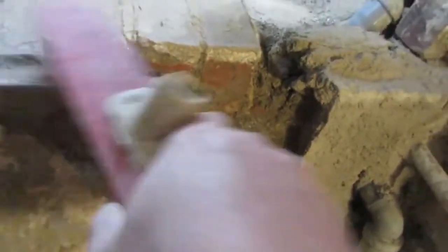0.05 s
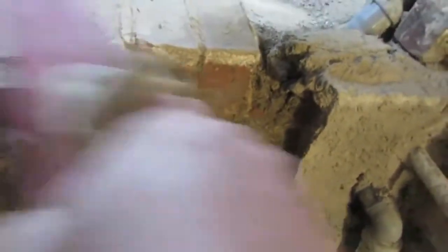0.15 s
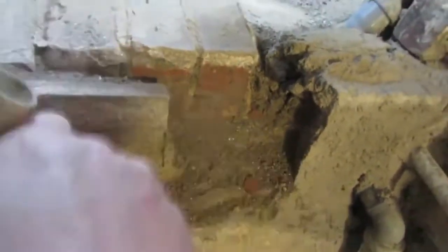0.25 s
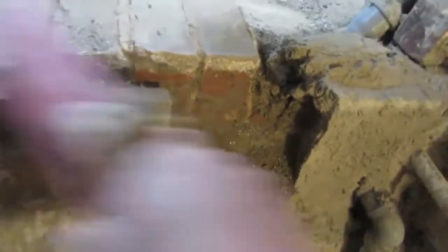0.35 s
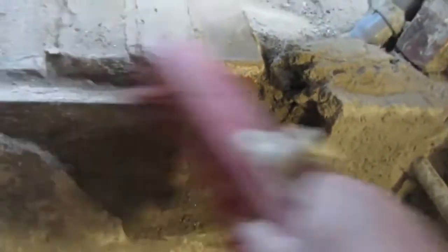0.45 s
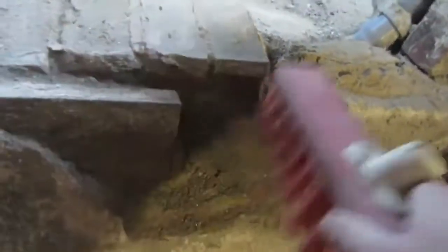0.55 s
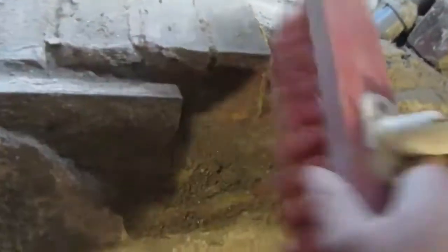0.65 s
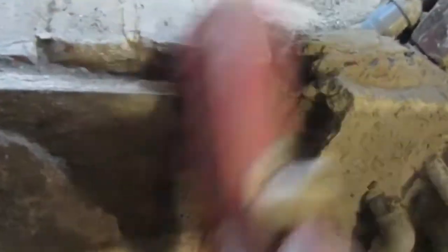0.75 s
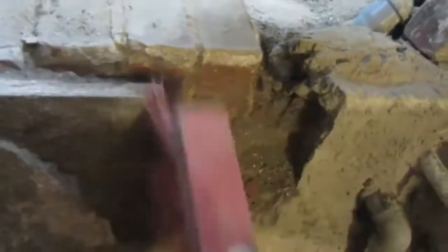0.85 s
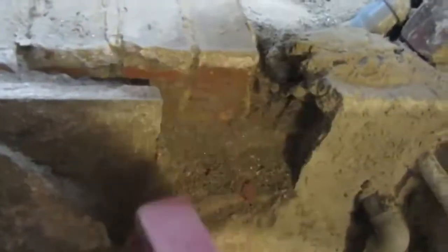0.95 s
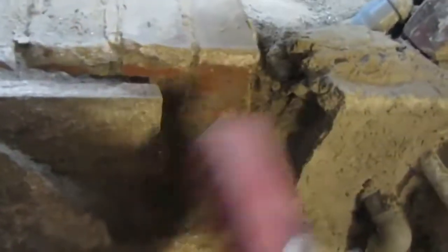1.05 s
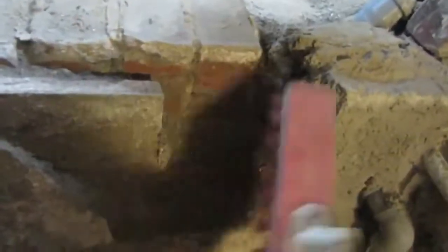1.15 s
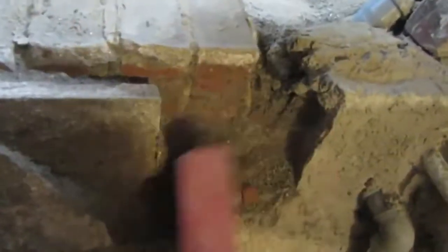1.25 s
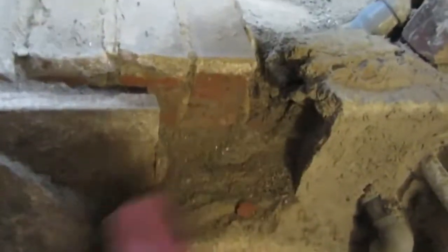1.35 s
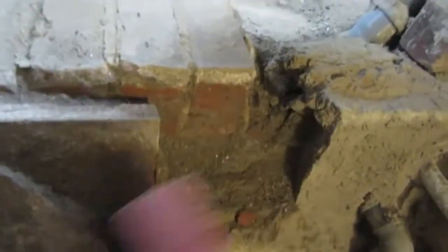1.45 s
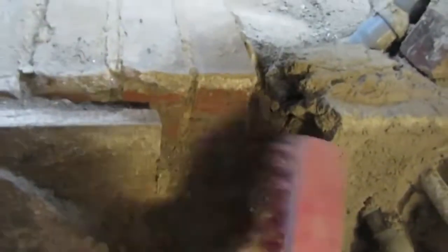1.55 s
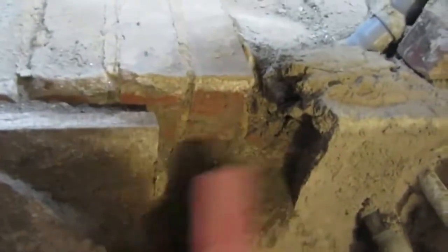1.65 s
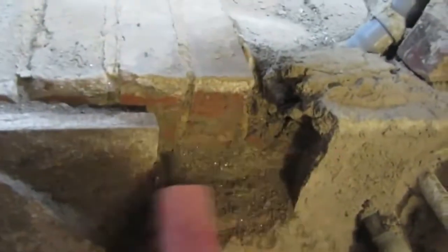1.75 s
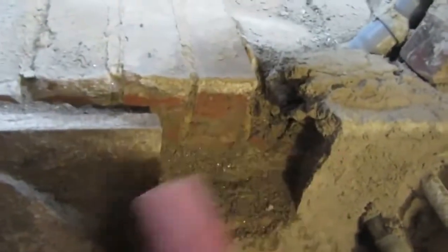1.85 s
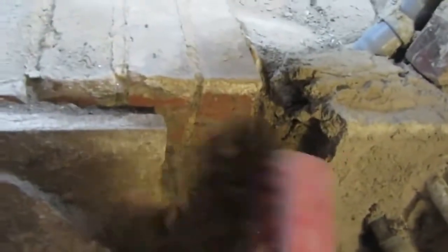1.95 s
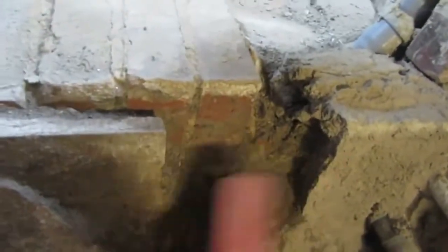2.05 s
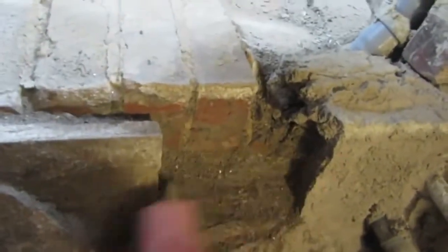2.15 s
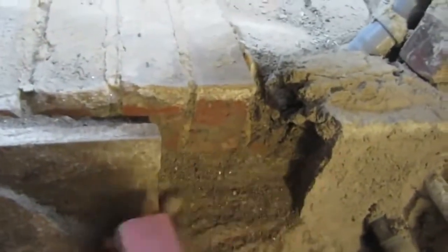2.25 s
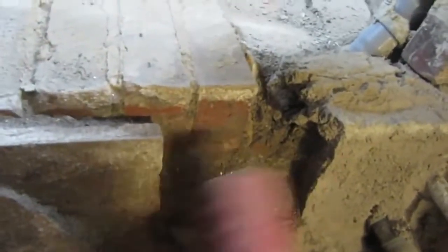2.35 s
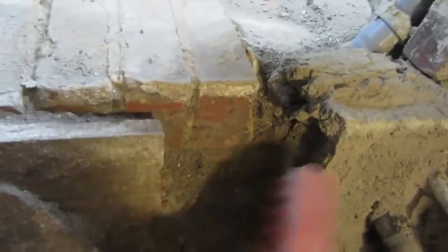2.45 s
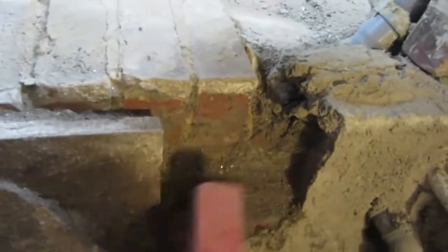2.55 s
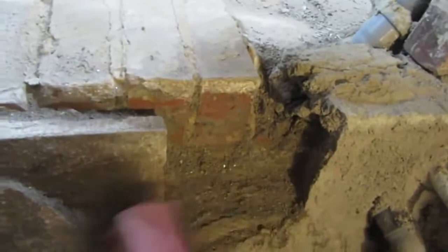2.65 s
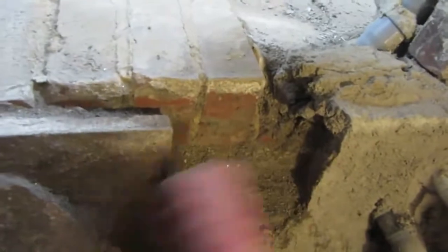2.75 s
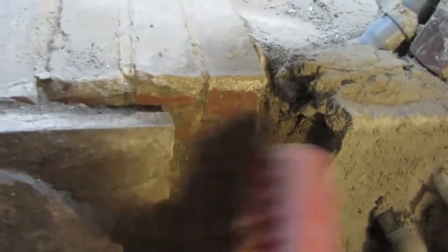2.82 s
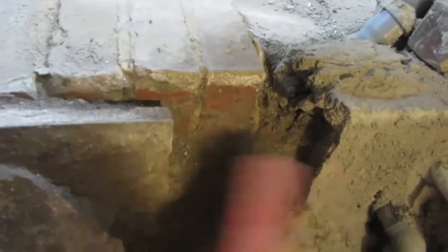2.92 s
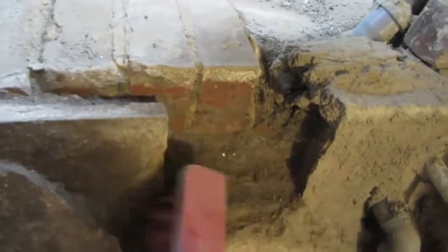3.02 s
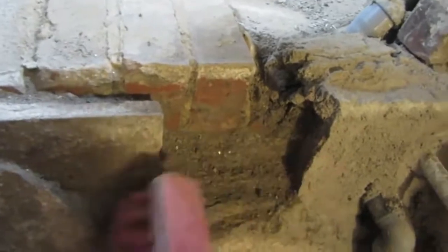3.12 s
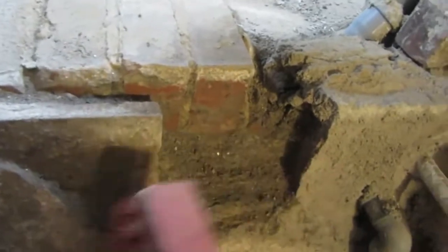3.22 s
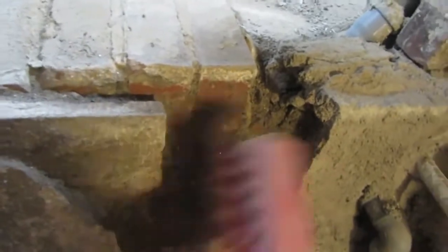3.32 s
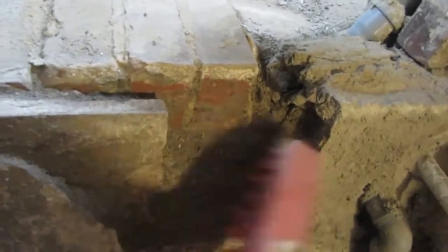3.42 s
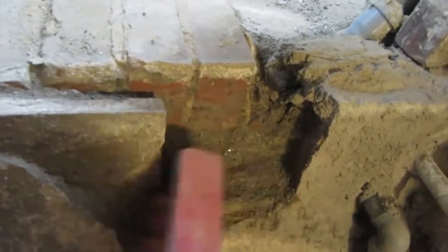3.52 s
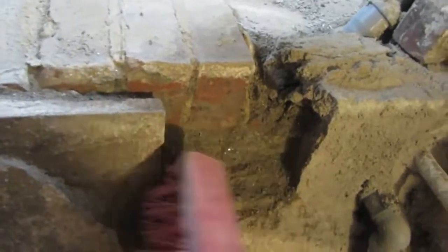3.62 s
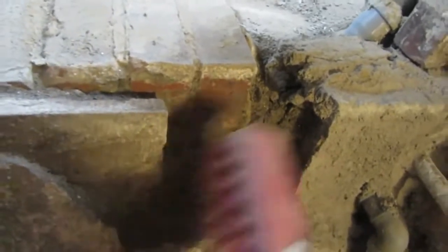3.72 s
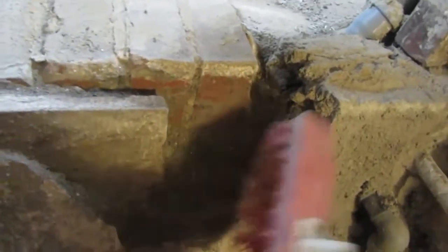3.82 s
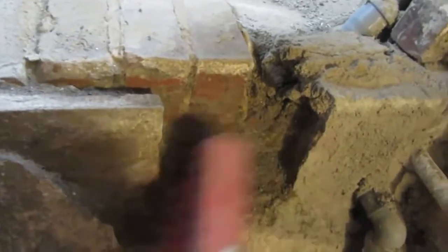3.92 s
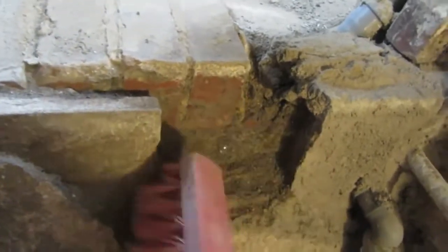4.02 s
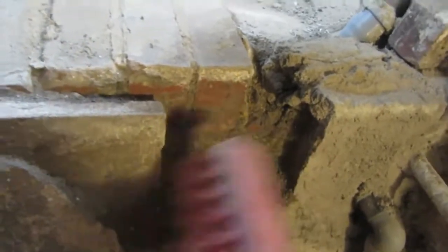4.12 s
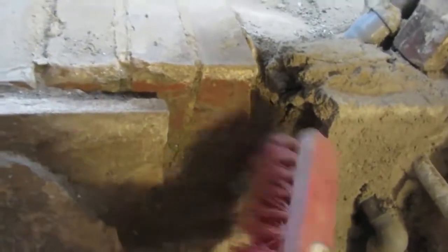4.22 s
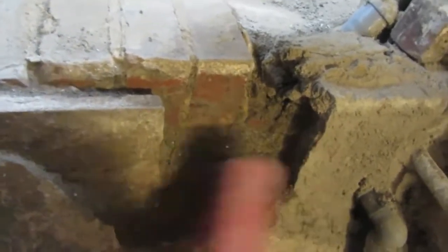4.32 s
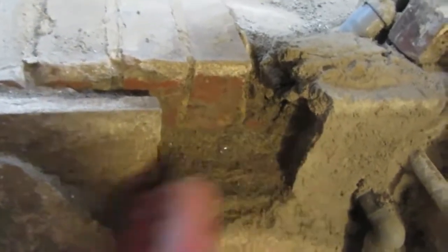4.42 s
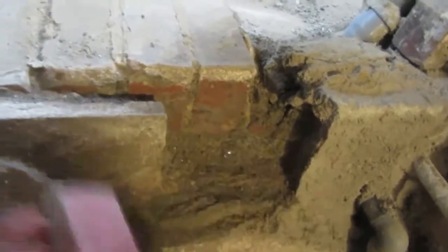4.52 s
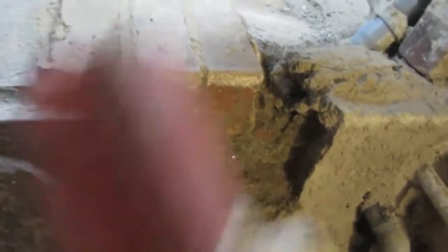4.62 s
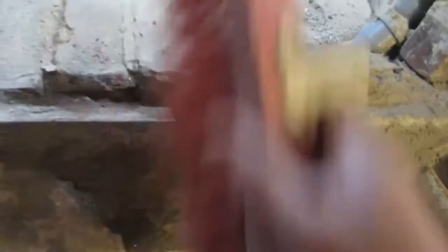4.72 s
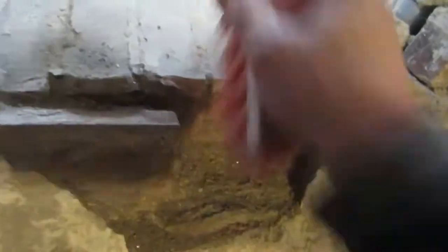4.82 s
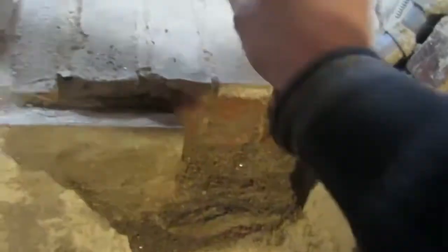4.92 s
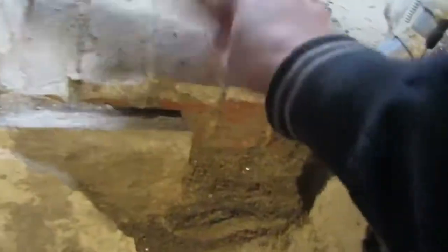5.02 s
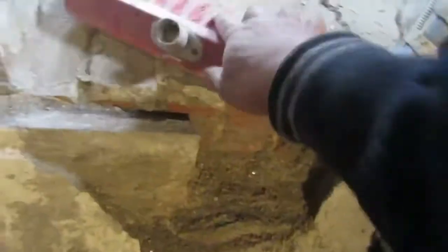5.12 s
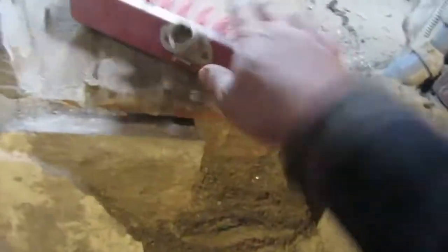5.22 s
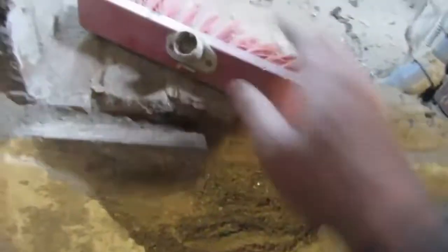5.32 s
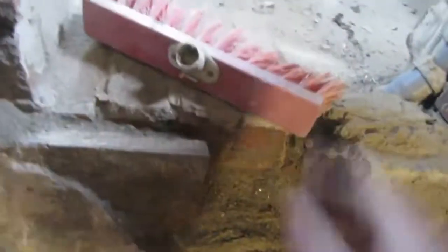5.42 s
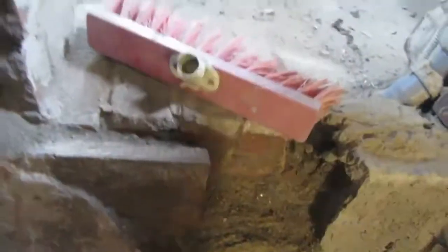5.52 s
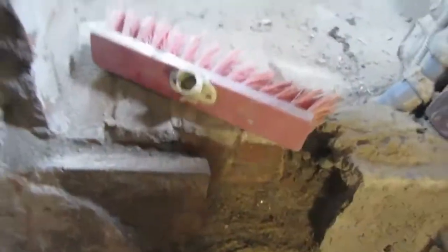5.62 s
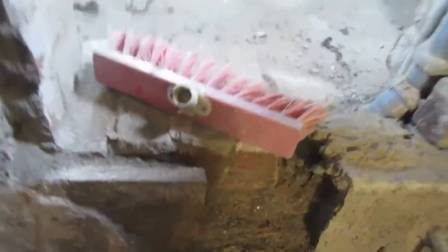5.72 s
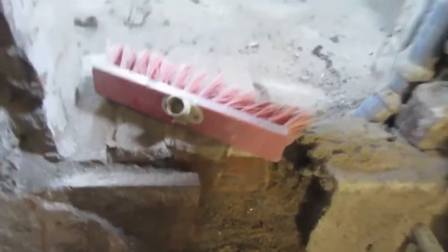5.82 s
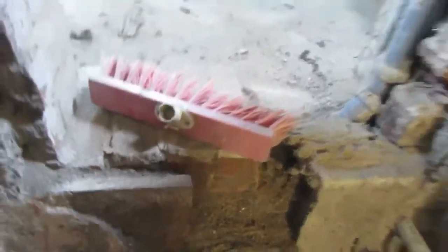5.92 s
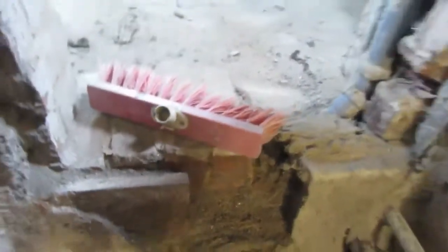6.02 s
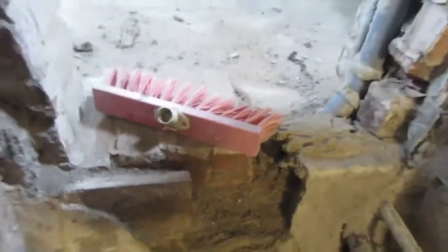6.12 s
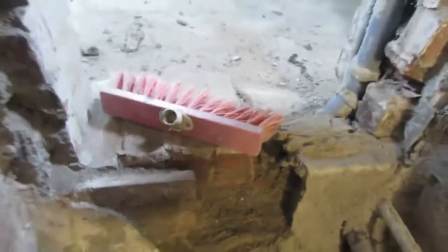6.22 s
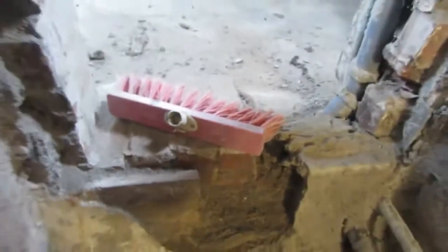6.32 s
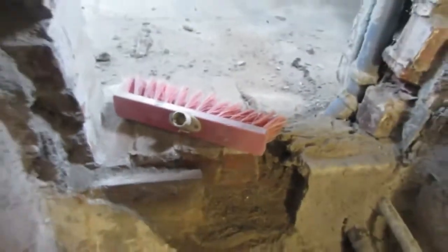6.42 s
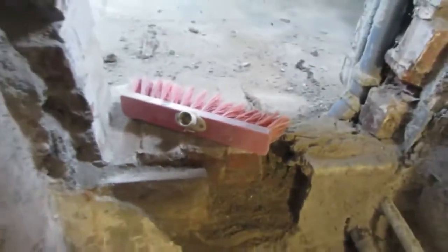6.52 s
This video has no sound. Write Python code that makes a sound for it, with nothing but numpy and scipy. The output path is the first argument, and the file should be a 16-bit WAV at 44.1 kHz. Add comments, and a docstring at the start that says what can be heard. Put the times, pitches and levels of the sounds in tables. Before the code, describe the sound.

Dry, close mono sound of a stiff brush scrubbing rough masonry in a stone corner, with only a short reflection around the knocks. It opens mid-stroke; strokes near 0.4 and 0.85 s run along a hard ledge, thin and scrapy, the earliest slightly ringing, with a sharp knock at 0.83. From 1.25 to 4.5 s bright hissing rasps land roughly every 0.4 s, fuller and stronger around 2.5 s, each with a woody block knock or low thump. Crisp chips tick throughout, sharpest around 1.55-1.7 s, and fine grit trickles between strokes. After 4.6 s only light rustle and grit remain. At 5.1 s the brush drops with the loudest, hard, overloaded clack and a small follow-up knock. Then quiet airy room noise and faint low hum, tiny touches near 5.6 and 6.1, a soft scuff at 6.36, and a faint whirr from 6.2 until the end at about 6.6 s.

```python
"""Stiff brush on rough masonry

A stiff hand brush scrubs grit off masonry in a stone corner, close to a small mono microphone.
Shaped noise snaps are the bristle tips; struck damped modes are the block knocking the stone.
Short noise bursts are loose grit ticking and trickling in between, softly struck low modes the thumps.
At last the brush is dropped, and a quiet room of air noise and hum remains, with a few faint touches."""
import sys
import numpy as np
from scipy import signal
from scipy.fft import rfft, irfft
from scipy.io import wavfile
from scipy.ndimage import uniform_filter1d

SR = 44100
rng = np.random.default_rng(int(sys.argv[2]) if len(sys.argv) > 2 else 0)


def gain_from_db(level_db):
    """Convert decibel levels to linear amplitude factors (20 dB per decade)."""
    decades = np.asarray(level_db, float) / 20
    return 10 ** decades


def digitize_waveform(pressure):
    """Quantize a signal to 16-bit integers and store it at the path in sys.argv[1].

    Rows of a 2-D input are taken as channels; values are limited to [-1, 1].
    """
    field = np.atleast_2d(pressure).T
    bounded = np.clip(field, -1, 1)
    quanta = np.round(bounded * 32767).astype(np.int16)
    wavfile.write(sys.argv[1], SR, quanta)


N = 289736

# modes of the brush block: (f/Hz, level before the drive/dB, t60/s)
BLOCK_MODES = [(170, 5, 0.026), (323, 9.5, 0.028), (656, -1.5, 0.012), (883, 4.5, .016),
               (1060, 1.5, 0.0099), (1380, 3.5, 0.015), (1700, 7.5, 0.0033), (2200, 18.5, 0.0024),
               (2900, 12, 0.0021), (4460, -10.5, 0.0026), (7250, 4, 0.0067)]
# the first strokes run along a hard ledge, a thin scrape that rings at first:
# (ring f/Hz, base t60/s, ring level re scrape/dB, ring until t/s, ledge until t/s)
LEDGE = (1860, .018, -3.5, .6, 1.06)


def unit(x):
    """Scale to rms 1."""
    return x / np.sqrt(np.mean(x ** 2))


def colour(x, points):
    """Filter by an (f/Hz, level/dB) outline."""
    hz, db = np.transpose(points)
    bins = np.arange(len(x) // 2 + 1) * SR / len(x) + 1
    gain_db = np.interp(np.log(bins), np.log(hz), db)
    return irfft(rfft(x) * gain_from_db(gain_db), len(x))


def band(x, low_hz, high_hz, order=2):
    """Butterworth band-pass."""
    edges = [low_hz, min(high_hz, .45 * SR)]
    return signal.sosfilt(signal.butter(order, edges, "band", fs=SR, output="sos"), x)


def ring(x, hz, t60):
    """One damped mode; a unit impulse starts it ringing with amplitude near 1."""
    r, w = np.exp(-np.log(1000) / (t60 * SR)), 2 * np.pi * hz / SR
    return signal.lfilter([0, r * np.sin(w)], [1, -2 * r * np.cos(w), r * r], x)


def walk(rate):
    """Random levels, a new one every 1 / rate s, joined by slopes; spread a little under 1."""
    k = int(SR / rate)
    steps = np.repeat(rng.standard_normal(N // k + 1), k)
    return uniform_filter1d(steps, k)[:N]


def snaps(rate, spread_db):
    """Tiny releases at random moments, rate per s, a few far larger than the rest."""
    moments = rng.random(N) < rate / SR
    return moments * rng.standard_normal(N) * gain_from_db(spread_db * rng.exponential(size=N))


def add(out, s, sound, db):
    """Place a sound at time s with the given peak."""
    i = int(s * SR)
    sound = sound[:N - i]
    out[i:i + len(sound)] += sound * gain_from_db(db) / np.abs(sound).max()


def curves(table):
    """Columns of a (t/s, ..) table, interpolated at every sample."""
    s, *columns = np.transpose(table)
    return [np.interp(np.arange(N) / SR, s, c) for c in columns]


def room():
    """Still air as coloured noise, a narrow noise hum that wavers and a faint whirr that sets in late."""
    # spectrum of the air: (f/Hz, relative level/dB)
    air_outline = [(15, -45.5), (25, -9.5), (354, 4.5), (1060, 8.5), (1350, 4.5), (2020, -3), (2370, -20),
                   (3010, -16), (3540, -25.5), (5140, -12), (15000, -35)]
    # swelling of the hum: (t/s, level/dB)
    hum_levels = [(0, -78), (.66, -55.5), (.95, -76), (1.66, -60), (2.1, -59), (2.4, -65), (4.55, -63.5),
                  (4.85, -53.5), (5.4, -81.5), (6.57, -63.5)]
    # late whirr: (from t/s, low f/Hz, high f/Hz, mean level/dB)
    whirr_setting = (6.17, 1500, 1950, -63)
    air = gain_from_db(-61 + 1.0 * walk(18)) * unit(colour(rng.standard_normal(N), air_outline))
    hum_hz, hum_width_hz = 90, 6.5
    hum = unit(band(rng.standard_normal(N), hum_hz - hum_width_hz / 2, hum_hz + hum_width_hz / 2))
    s, low_hz, high_hz, db = whirr_setting
    fade_in = np.clip((np.arange(N) / SR - s) / 0.036, 0, 1)
    whirr = fade_in * unit(band(rng.standard_normal(N), low_hz, high_hz))
    return air + gain_from_db(curves(hum_levels)[0]) * hum + gain_from_db(db + 2 * walk(9)) * whirr


def bumps():
    """Low, soft thuds: a rounded push sets off one short-lived mode."""
    # thumps under the heavier landings, later from further off: (t/s, peak level/dB, f/Hz)
    thumps = [(0.835, -35, 200), (1.695, -28.5, 160), (2.119, -27.5, 170), (2.946, -29, 165),
              (3.465, -21, 170), (3.924, -31.5, 160), (4.319, -23.5, 165), (5.1005, -13, 418),
              (5.166, -25, 425), (5.576, -56, 148), (5.647, -51, 148), (6.064, -46, 148), (6.365, -50, 198),
              (6.479, -46, 148), (6.52, -56, 148)]
    out, t = np.zeros(N), np.arange(SR // 5) / SR
    for s, db, hz in thumps:
        push = np.exp(-t * hz / 0.75) * t
        add(out, s, band(ring(push, hz, 13 / hz), .7 * hz, 3 * hz), db)
    return out


def grit():
    """Each stone chip cracks, then skitters to rest: a noise burst with a fast and a slow decay."""
    # grit striking stone: (t/s, peak level/dB, centre f/Hz)
    chips = [(0.2523, -28, 6840), (0.3815, -13, 7360), (0.7573, -22.5, 5430), (0.7882, -23.5, 4670),
             (1.1003, -27, 2760), (1.1452, -19, 4930), (1.2436, -18, 2750), (1.4894, -33, 3260),
             (1.5577, -6.5, 4940), (1.633, -16.5, 6340), (1.6557, -13.5, 6660), (1.6833, -6, 2964),
             (2.0363, -10.5, 3380), (2.0975, -8, 3510), (2.319, -13, 6650), (2.4385, -23, 2790),
             (2.4735, -7.5, 4700), (2.491, -16.5, 6590), (2.793, -11, 3360), (2.833, -14, 4100),
             (2.91, -9, 3600), (3.276, -26.5, 3450), (3.3333, -19, 6340), (3.3837, -26.5, 2740),
             (3.739, -22.5, 6830), (3.8804, -14, 4320), (4.1942, -16.5, 2900), (4.2522, -12.5, 5080),
             (4.2956, -16, 6500), (4.59, -15, 5570), (4.6207, -20, 2630), (4.837, -24, 2860),
             (4.9423, -20.5, 3000), (5.0317, -18.5, 4950)]
    out, t = np.zeros(N), np.arange(SR // 8) / SR
    for s, db, hz in chips:
        decay = np.exp(-t / .0007) + .3 * np.exp(-t / .005)
        burst = rng.standard_normal(len(t)) * decay
        add(out, s, band(burst, hz / 1.6, hz * 1.6, order=1), db)
    return out


def knocks():
    """A first contact, then a rattle over the rough face; modes far from the best-driven one get less."""
    # the block on stone: (t/s, peak level before the bass cut/dB, best-driven f/Hz, rattle time/s)
    blows = [(0.317, -26, 1900, 0.012), (0.405, -11.5, 1180, 0.0041), (0.834, -4, 2200, 0.0045),
             (1.26, -16.5, 880, 0.033), (1.285, -37, 900, 0.0074), (1.468, -26.5, 1550, 0.015),
             (1.676, -19.5, 1080, 0.0052), (1.698, -14, 885, 0.018), (2.021, -15, 902, 0.0041),
             (2.075, -11.5, 1406, 0.0077), (2.115, -18, 907, 0.0081), (2.33, -21, 798, 0.012),
             (2.51, -6.5, 1600, 0.016), (2.523, -33, 2200, 0.0052), (2.748, -23.5, 297, 0.0039),
             (2.945, -9.5, 1003, 0.015), (3.465, -10, 562, 0.01), (3.762, -23.5, 892, 0.012),
             (3.889, -12.5, 1020, 0.017), (3.924, -10, 873, 0.01), (4.319, -7, 974, 0.0096),
             (4.711, -23.5, 1620, 0.018), (5.014, -23.5, 1700, 0.0057), (5.0998, 5.5, 1620, 0.0024),
             (5.1663, -18.5, 754, 0.003), (5.234, -42, 504, 0.0024), (6.364, -33, 400, 0.0029)]
    crack_db, crack_db_per_db = -6, .25  # harder blows crack brighter
    out, t = np.zeros(N), np.arange(SR // 6) / SR
    for s, db, best_hz, rattle in blows:
        # quick re-contacts carry little net push, so they spare the lowest modes
        recontacts = rng.standard_normal(len(t)) * np.exp(-(t / max(rattle, 5e-4)) ** 2)
        force = .5 * band(recontacts, 600, SR, order=1)
        force[0] += 1
        drive_db = -8 * np.abs(np.log2(np.array(BLOCK_MODES)[:, 0] / best_hz))  # 8 dB less per octave
        body = sum(gain_from_db(mode_db + d) * ring(force, hz, t60)
                   for d, (hz, mode_db, t60) in zip(drive_db, BLOCK_MODES))
        # the bare contact cracks across the treble
        crack = gain_from_db(crack_db + crack_db_per_db * db) * band(force, best_hz, 12000, order=1)
        add(out, s, body + crack, db)
    # so small a block radiates no deep bass
    return band(out, 120, SR)


def corner(x):
    """Scattered reflections off the stone, as decaying noise bands; lows linger."""
    # reflections: (centre f/Hz, starting level/dB, t60/s)
    reflections = [(150, -52, .45), (250, -53, .4), (400, -50, .36), (700, -56, .33), (1500, -53, .27),
                   (3000, -56, .2), (8500, -62, .08)]
    t = np.arange(SR // 2) / SR
    tail = np.zeros(len(t))
    for hz, db, t60 in reflections:
        scatter = unit(band(rng.standard_normal(len(t)), hz / 1.5, hz * 1.5))
        tail += gain_from_db(db) * scatter * np.exp(-np.log(1000) * t / t60)
    return x + signal.fftconvolve(x, tail * (t > .003))[:N]


def trickle():
    """Small loose grains skittering as decaying noise, in three pitch ranges."""
    skitter = np.exp(-np.arange(400) / 90.)
    total = np.zeros(N)
    for hz in (2200, 5000, 10000):
        envelope = np.convolve(np.abs(snaps(120, 1.5)), skitter)[:N]
        grains = envelope * rng.standard_normal(N)
        total += unit(band(grains, hz / 1.6, hz * 1.6))
    return unit(total)


def pressure():
    """Levels in dB of hiss, scrape and drag: each stroke rises, holds and lifts off; scuffs just brush past."""
    # what sounds on between strokes, sliding grit and faint rustle:
    # (t/s, hiss level/dB, scrape level/dB, drag level/dB)
    between = [(0, -60.5, -46.5, -60), (.7, -49.5, -52, -58), (1.1, -59.5, -53.5, -57),
               (1.24, -44, -46.5, -56), (1.53, -50.5, -47, -63), (1.65, -36, -42, -49),
               (2.0, -44.5, -41.5, -51), (2.4, -39, -36.5, -42.5), (2.8, -36.5, -38, -42.5),
               (3.3, -43.5, -38.5, -49.5), (3.85, -45, -43.5, -51.5), (4.25, -47.5, -45, -53),
               (4.7, -42.5, -38.5, -55), (4.85, -47, -45.5, -49.5), (5.07, -42.5, -43, -60.5),
               (5.12, -47.5, -49, -44), (5.31, -70, -71, -64), (5.89, -67, -62.5, -65),
               (6.16, -68, -66, -69), (6.3, -65, -59.5, -57.5), (6.57, -63, -63, -58)]
    # strokes, and at 0.834 s a brief stab of hiss as the block knocks and rattles on the stone: (landing t/s,
    # rise time/s, pressed time/s, lift time/s, full bristle hiss level/dB, scrape level re hiss at half the
    # pressed time/dB)
    strokes = [(0.0, 0.026, 0.1, 0.05, -25, -4.5), (0.37, .035, 0.2, 0.029, -20, -8.5),
               (0.8337, .002, 0.0058, .008, -11.5, 1), (0.852, 0.01, 0.11, 0.056, -22, -8),
               (1.258, 0.0099, 0.11, 0.078, -21.5, -7.5), (1.668, 0.036, 0.16, 0.067, -20.5, -7),
               (2.093, 0.034, 0.13, 0.065, -18, -8), (2.503, 0.06, 0.18, 0.046, -16.5, -7.5),
               (2.923, 0.015, 0.18, 0.087, -18, -8), (3.481, 0.021, 0.063, 0.11, -17.5, -6.5),
               (3.913, 0.025, 0.11, 0.08, -19, -7.5), (4.33, 0.044, .15, 0.033, -17, -9)]
    # brief brushes against the stone: (peak t/s, half-width/s, hiss level/dB, scrape level re hiss/dB)
    scuffs = [(.321, 0.017, -34, -1.5), (1.968, 0.035, -33.5, -18), (2.075, 0.015, -26, -8),
              (2.81, 0.012, -33, -2), (3.777, 0.018, -38, 3.5), (4.322, 0.011, -23, -17),
              (4.6, 0.062, -40, -20), (5.09, 0.015, -24, -12), (6.361, .024, -48.5, 0.5),
              (6.451, 0.048, -56, 1)]
    scrape_sag_db_per_s = 25.5  # the block lightens along the stroke
    drag_re_hiss_db, ledge_drag_db, drag_sag_db_per_s = -33.5, -6.5, 51  # strongest on landing
    t = np.arange(N) / SR
    # powers add, so overlapping contacts build up
    hiss, scrape, drag = (gain_from_db(db) ** 2 for db in curves(between))
    for s, rise, pressed, lift, db, scrape_db in strokes:
        since = np.maximum(t - s, 0)
        off = np.exp(-(np.maximum(since - pressed, 0) / lift) ** 2)
        contact = (1 - np.exp(-since / rise)) * off * gain_from_db(db)
        hiss = hiss + contact ** 2
        sagging_db = scrape_db - scrape_sag_db_per_s * (since - pressed / 2)
        scrape = scrape + (contact * gain_from_db(sagging_db)) ** 2
        landing_db = db + drag_re_hiss_db + ledge_drag_db * (s < LEDGE[-1])
        drag = drag + ((since > 0) * off * gain_from_db(landing_db - drag_sag_db_per_s * since)) ** 2
    for s, width, db, scrape_db in scuffs:
        touch = np.exp(-((t - s) / width) ** 2) * gain_from_db(db)
        hiss = hiss + touch ** 2
        scrape = scrape + (touch * gain_from_db(scrape_db)) ** 2
    return [10 * np.log10(power) for power in (hiss, scrape, drag)]


def rubbing():
    """Bristle snaps: dense when pressed hard, mixed with sparse trickling grit when the brush lifts."""
    # spectrum of the bristle tips: (f/Hz, relative level/dB)
    bristle_outline = [(1060, -69), (1800, -36.5), (2420, -25.5), (3010, -13), (4640, -6), (5160, -7.5),
                       (7080, -5.5), (10400, -8), (14400, -19), (15500, -18.5)]
    # bristle rings: (f/Hz)
    twang_hz = [2403, 3070, 4280, 5400, 7070, 8670]
    loose_share = .55  # most of the power between strokes that comes as separate grains
    hiss_db, scrape_db, drag_db = pressure()
    dense = unit(snaps(20000, 1.0)) * gain_from_db(1.5 * walk(70) + 1.1 * walk(22))

    # now one, now another length of bristle sings out
    twang = sum(gain_from_db(4.5 * walk(14)) * unit(ring(dense, hz, 24 / hz)) for hz in twang_hz)
    # grit falls only in the half-quiet between strokes
    loose = np.clip((-30 - hiss_db) / 8, 0, 1) * np.clip((hiss_db + 58) / 6, 0, 1)
    tips = np.sqrt(1 - loose_share * loose) * dense + np.sqrt(loose_share * loose) * trickle()
    hiss = unit(unit(colour(tips, bristle_outline)) + gain_from_db(-10) * unit(twang))

    # tufts catch and let go together, ringing the block from inside
    tufts = snaps(5000, 0.69) * gain_from_db(4.0 * walk(45))
    block = sum(gain_from_db(db) * ring(tufts, hz, t60) for hz, db, t60 in BLOCK_MODES)
    ring_hz, base_t60, ring_db, ring_until, ledge_until = LEDGE
    ringing, on_ledge = (np.arange(N) < s * SR for s in (ring_until, ledge_until))
    # the ring wanders between neighbouring pitches
    wavering = unit(sum(gain_from_db(5 * walk(11)) * ring(dense, ring_hz * share, 1.5 * base_t60)
                        for share in (.96, 1, 1.04)))
    grain = np.where(on_ledge, band(tips, 1260, 3500), band(tips, 550, 3630))
    block_share = np.where(on_ledge, .2, .5)
    scrape = unit(block_share * unit(band(block, 550, 1600)) + unit(grain))
    scrape = scrape + ringing * (1 - loose) * gain_from_db(ring_db) * wavering

    # low stick-slip: a boom at 160 Hz and a broader rumble above it
    boom = unit(ring(snaps(300, 2.2), 160, .13))
    rumble = unit(band(snaps(900, 2.0), 170, 480))
    drag = unit(boom + 1.3 * rumble)
    return gain_from_db(hiss_db) * hiss + gain_from_db(scrape_db) * scrape + gain_from_db(drag_db + 0.73 * walk(27)) * drag


def scene():
    """One microphone feeds both channels; only the separate impacts excite the corner."""
    mono = room() + corner(bumps() + grit() + knocks()) + rubbing()
    return np.array([mono, mono])


def roll_off(x):
    """The treble ends steeply here."""
    return signal.sosfilt(signal.butter(12, 16030, fs=SR, output="sos"), x)


def record(dry):
    """Peaks beyond full scale overload and clip; a steep low-pass cuts the top."""
    clipped = np.clip(dry, -1, 1)
    top_hz = 15050
    low_pass = signal.ellip(10, .2, 36, top_hz, fs=SR, output="sos")
    mix = signal.sosfilt(low_pass, clipped)
    return roll_off(mix)


dry = scene()
out = record(dry)
digitize_waveform(out)
```